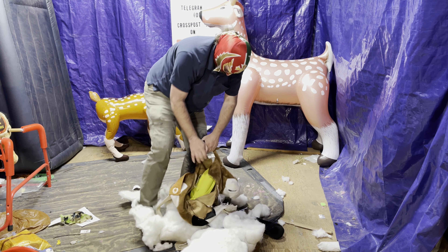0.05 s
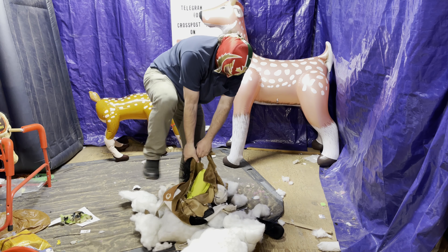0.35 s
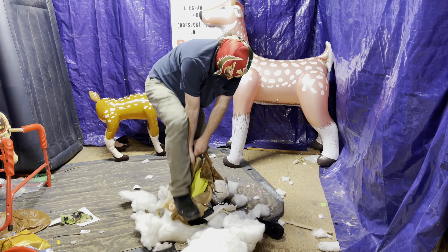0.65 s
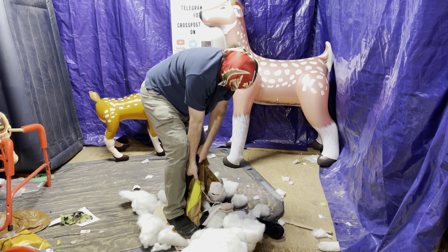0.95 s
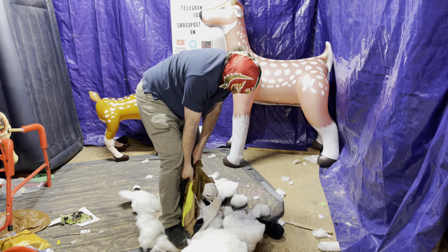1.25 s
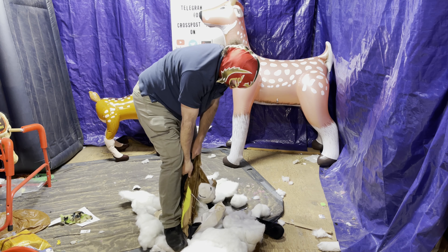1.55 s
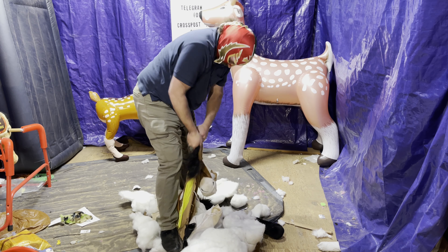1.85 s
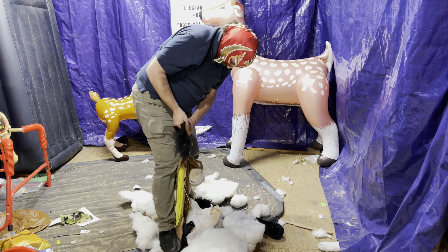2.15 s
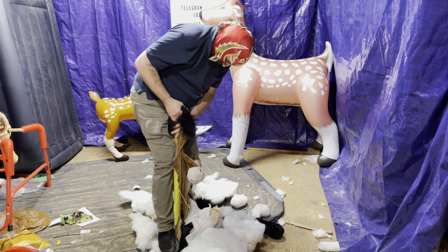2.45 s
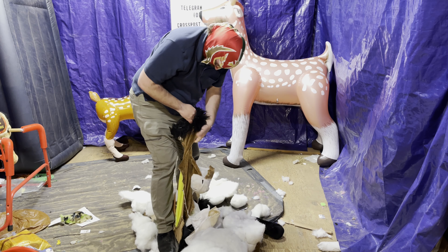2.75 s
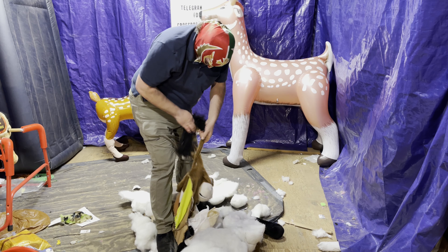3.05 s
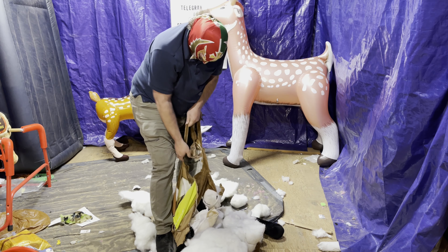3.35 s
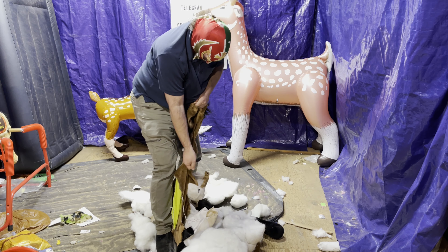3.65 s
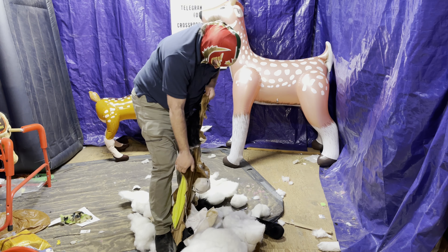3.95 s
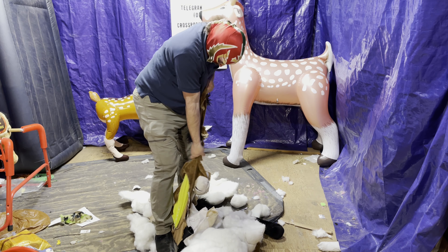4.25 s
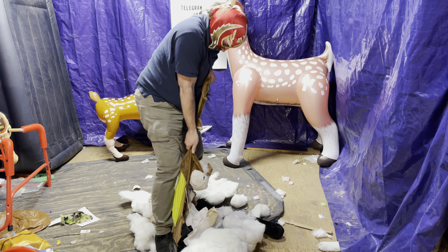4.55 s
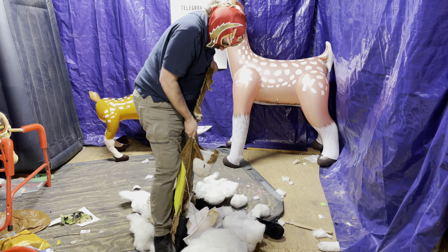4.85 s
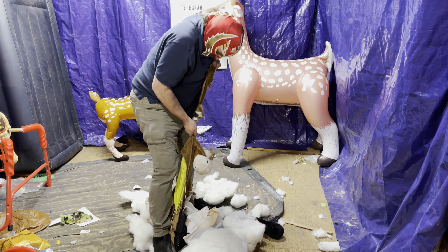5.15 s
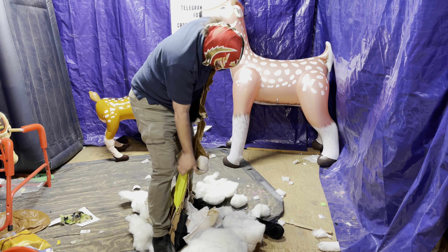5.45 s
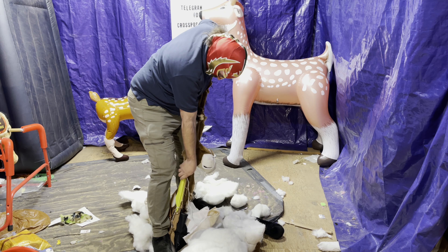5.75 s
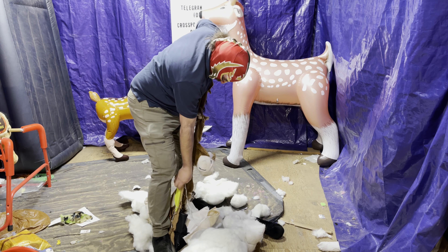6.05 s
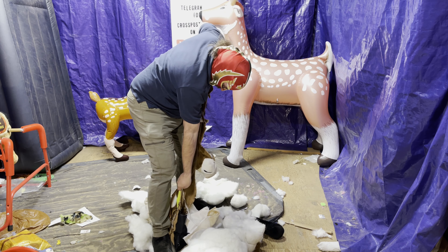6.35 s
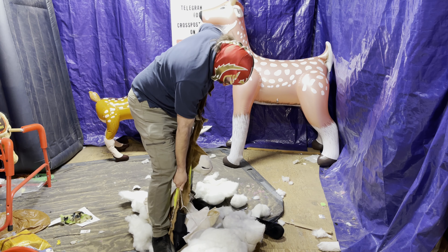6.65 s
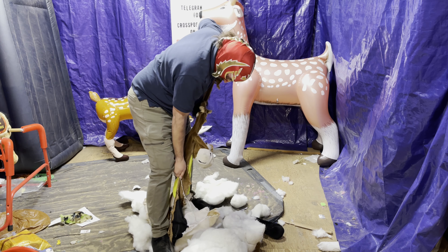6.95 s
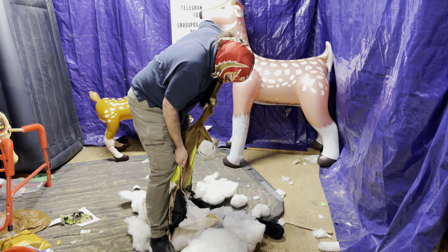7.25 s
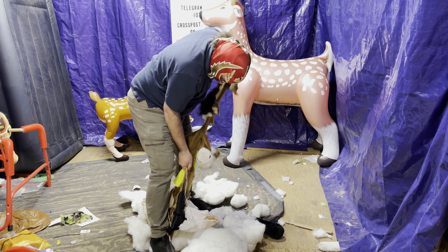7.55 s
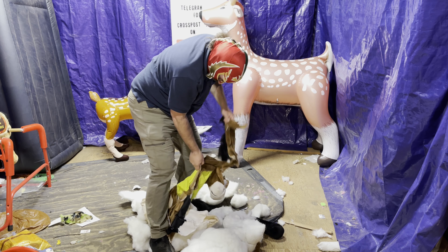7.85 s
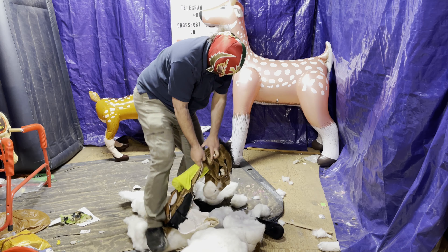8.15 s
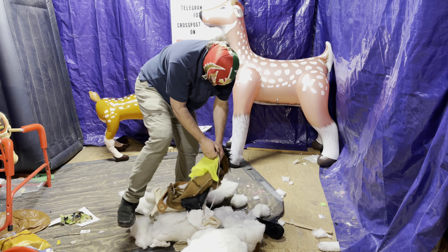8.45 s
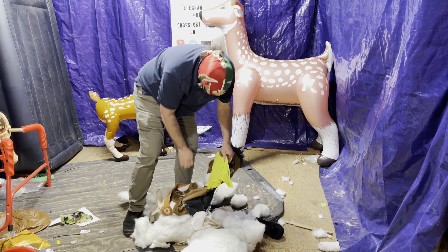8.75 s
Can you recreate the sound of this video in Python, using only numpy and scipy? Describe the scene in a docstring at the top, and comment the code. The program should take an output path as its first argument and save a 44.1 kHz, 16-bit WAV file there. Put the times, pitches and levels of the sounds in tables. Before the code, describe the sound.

A ventilation fan hums low and steady in a small room while the emptied skin of a large plush toy is torn by hand, a couple of metres away. Cloth slides softly and feet shift during the first second. From about 1 second seams snap with sharp cracks, each with a pop and flap of taut fabric, strongest near 1.6 seconds. From 1.8 to 2.5 seconds the weave runs in one longer, crackling tear. Quiet rustling follows, then a cluster of snaps and short rips around 3.3 to 3.5 seconds and four more snaps between 4.6 and 5 seconds. A soft step lands at 5.5 seconds. After faint rubbing and a few small ticks, a strong snap and dull flap free the strip at 7.3 seconds. Loose cloth swishes near 7.8 seconds, and a few steps tap and thud on boards until about 9 seconds.

```python
"""The emptied skin of a large plush toy is torn by hand in a small workshop, a couple of metres away.
Cloth slides and feet shift over a fan's steady hum. From 1 s seams snap: the thread cracks, the taut
cloth pops and flaps. At 1.8-2.5 s the weave runs in one long tear of many small threads; more snaps
follow near 3.4 s and 4.8 s. At 7.3 s the strip comes free and the whole skin flaps.
Swishes of loose cloth and a few steps end the scene."""
import sys
import numpy as np
from scipy import signal
from scipy.fft import rfft, irfft
from scipy.io import wavfile

SR = 44100
rng = np.random.default_rng(int(sys.argv[2]) if len(sys.argv) > 2 else 0)


def write(x):
    x = np.atleast_2d(x).T
    wavfile.write(sys.argv[1], SR, np.round(np.clip(x, -1, 1) * 32767).astype(np.int16))


N = 396900
TIME = np.arange(N) / SR
# a thread or seam gives way: (time [s], strength [dB], tautness [dB], pop [Hz])
SEAM_SNAPS = [(0.9908, -35.5, 3, 1380), (1.0554, -27.5, -2.5, 1300), (1.060, -34.5, -12.5, 1094),
              (1.3499, -22, 4.5, 1160), (1.4719, -21, 0, 1380), (1.639, -16, -1.5, 860),
              (1.805, -35.5, -3.5, 300), (1.934, -24, 4, 970), (1.980, -30.5, 3, 1200),
              (2.003, -25, 2.5, 755), (2.0214, -25.5, 0, 1270), (2.050, -25.5, 0.5, 830),
              (2.091, -28.5, 4.5, 420), (2.136, -27.5, 0, 720), (2.197, -26.5, 2.5, 1280),
              (2.288, -29, 1.5, 710), (2.320, -24.5, 2.5, 740), (2.595, -52.5, 8, 465),
              (3.116, -54, 0, 1520), (3.289, -32.5, 3.5, 1250), (3.327, -27, 5.5, 1180),
              (3.3706, -26.5, 1, 960), (3.394, -35.5, -4, 1170), (3.476, -33, -3, 380),
              (3.515, -30, 1.5, 720), (4.631, -22, -2, 567), (4.695, -25, -4.5, 570),
              (4.9667, -26.5, 2.5, 1810), (5.0045, -23.5, -3.5, 517), (6.795, -36, -6.5, 470),
              (7.045, -42, 7, 780), (7.062, -49, -9.5, 820), (7.254, -32, 5, 1900),
              (7.2628, -19.5, -4.5, 840), (8.656, -42, 5, 1450)]


def cracks(crack_db=20, tick_db=20):
    """A thread parts with a broad crack and a high tick, louder the tauter it was."""
    out = np.zeros(N)
    for s, strength_db, taut_db, _ in SEAM_SNAPS:
        add(out, s + 0.00039, from_db(strength_db + crack_db) * click(2300, 7500, spray_s=0.0014))
        add(out, s, from_db(strength_db + taut_db + tick_db) * burst(9400, 15000, decay_s=0.0016))
    return out


def recoils(pop_db=22, thud_db=17, floor_echo_share=0.5, parting_s=7.2675, parting_db=7):
    """Released cloth pops, the floor echoes it, the cloth flaps with a thud; slack cloth moves more."""
    out = np.zeros(N)
    for s, strength_db, taut_db, pop_hz in SEAM_SNAPS:
        recoil_db = strength_db - taut_db
        pop_gain = from_db(recoil_db + pop_db)
        pop = unit_energy(band(pulse(pop_hz, cycles=0.33), 220, 3800, order=1))
        add(out, s + 0.0007, -pop_gain * pop)
        add(out, s + 0.00198, pop_gain * floor_echo_share * burst(750, 1500, decay_s=0.0023))
        add(out, s + 0.0039, from_db(recoil_db + thud_db) * thud(hz=137.2))
    add(out, parting_s, from_db(parting_db) * thud(hz=121))  # strip comes free, whole skin flaps
    return out


def rips(edge_s=0.0037, tear_flap_db=-2.5):
    """The weave runs in one long tear and several short rips while the freed edge flaps."""
    # pull on the long tear: (time [s], level [dB])
    long_tear = [(1.799, -36.5), (1.85, -30), (1.885, -22), (1.92, -22), (1.959, -33), (2.061, -30.5),
                 (2.14, -37.5), (2.22, -27), (2.3, -40), (2.335, -27.5), (2.393, -22), (2.415, -38.5),
                 (2.5, -43.5)]
    # seam runs: (start [s], length [s], level [dB], relative flap [dB])
    short_rips = [(1.471, 0.046, -24.5, -2), (1.636, 0.08, -22, 7.5), (3.298, 0.05, -37.5, 9),
                  (3.381, 0.034, -31, 7), (3.474, 0.046, -38, 11), (3.52, .035, -28.5, 8),
                  (7.832, 0.039, -40, 1)]
    # spectra of threads and flapping cloth: (frequency [Hz], density [dB])
    thread_spectrum = [(100, -14.5), (250, 0.5), (700, -1.5), (1400, 0), (2500, -6.5), (4500, -7.5),
                       (7500, -8.5), (11000, -3.5), (16000, -10)]
    flap_spectrum = [(20, -13), (35, -8.5), (65, 4), (130, -1), (220, -5), (500, -19.5), (2000, -71.5)]
    tear_s, tear_db = np.transpose(long_tear)
    pull = from_db(np.interp(TIME, tear_s, tear_db)) * (TIME > tear_s[0]) * (TIME < tear_s[-1])
    flap = pull * from_db(tear_flap_db)
    for s, length_s, level_db, flap_db in short_rips:
        t = TIME[:int(length_s * SR)]
        run = from_db(level_db) * np.clip(np.minimum(t, length_s - t) / edge_s, 0, 1)
        add(pull, s, run)
        add(flap, s, run * from_db(flap_db))
    tearing = shaped_noise(thread_breaks(pull), thread_spectrum)
    flapping = shaped_noise(flap, flap_spectrum)
    return from_db(-4.5) * tearing + from_db(-12) * flapping


def thread_breaks(pull, spread_db=5.5, fuzz=0.4, bundle_s=0.00018):
    """Envelope of uneven threads breaking in turn, faster under a harder pull."""
    ref_per_s, min_per_s, ref_db, doubling_db = 760, 290, -28, 5
    doublings = (20 * np.log10(pull + 1e-9) - ref_db) / doubling_db
    chance = np.maximum(ref_per_s * 2 ** doublings, min_per_s) / SR
    sizes = rms_one(from_db(spread_db * np.minimum(rng.exponential(1, N), 3)))
    signs = rng.choice([-1, 1], N)
    threads = sizes * signs * (rng.random(N) < chance) / np.sqrt(chance)
    breaks = pull * (threads + fuzz * rng.standard_normal(N))
    bundle = unit_energy(np.exp(-TIME[:200] / bundle_s))  # a thread's fibres part in quick succession
    power = signal.fftconvolve(breaks ** 2, bundle ** 2)[:N]
    return np.sqrt(np.abs(power))


def rustle(grain_db=3):
    """Pile rubs on pile in small catches, swung cloth swishes darker; brief narrow hisses near 10 kHz."""
    # (start [s], length [s], level [dB])
    slides = [(0, 0.64, -53), (0.57, 0.42, -49), (0.871, 1.74, -51), (2.3, 0.75, -58.5), (2.996, 0.83, -57),
              (4.19, 0.44, -59.5), (4.4, 0.74, -53.5), (4.96, 0.64, -57), (6.231, 0.58, -58.5),
              (6.696, 0.85, -58.5), (7.427, 0.39, -56.5), (7.735, 0.28, -44.5), (7.895, 0.73, -52.5),
              (8.548, 0.57, -51)]
    swishes = [(0.067, 0.04, -37.5), (1.021, 0.04, -40), (6.78, 0.12, -44), (6.899, 0.085, -43.5),
               (7.11, 0.15, -48), (7.835, 0.11, -34.5), (8.079, 0.104, -50), (8.362, 0.1, -53.5),
               (8.856, 0.06, -50)]
    high_hisses = [(1.645, 0.15, -41.5), (2.45, 0.57, -62), (3.38, 0.031, -33), (3.52, 0.032, -33),
                   (8.64, 0.32, -53)]
    # spectra of the rustle, top cut off above 12 kHz: (frequency [Hz], density [dB])
    slide_spectrum = [(80, -11.5), (200, 5), (500, 8.5), (1200, 2), (2200, 1), (3200, -1.5), (4700, 2),
                      (7500, -2.5), (11200, 1), (12500, -15.5), (14000, -44.5)]
    swish_spectrum = [(30, -3.5), (70, 3), (140, 5), (300, -2), (550, -1.5), (1000, -2.5), (1800, -13),
                      (4000, -15), (8000, -17), (12000, -17), (16000, -45.5)]
    slide = eased_moves(slides) * from_db(grain_db * drift(rate_hz=260))
    swish = arches(swishes) * from_db(grain_db * drift(rate_hz=200))
    hiss = arches(high_hisses) * rms_one(band(rng.standard_normal(N), 9500, 10550))
    sliding = shaped_noise(slide, slide_spectrum)
    swishing = shaped_noise(swish, swish_spectrum)
    return from_db(-4.5) * sliding + from_db(-4) * swishing + hiss


def steps():
    """The sole taps and the weight comes down on the boards."""
    # (time [s], tap [dB], thud [dB])
    footfalls = [(.095, -59, -67), (0.804, -66, -47), (0.873, -60, -46), (5.534, -40.5, -41.5),
                 (7.941, -59, -36.5), (8.128, -53, -36), (8.405, -45, -47), (8.69, -29, -45),
                 (8.723, -45, -32)]
    out = np.zeros(N)
    for s, tap_db, thud_db in footfalls:
        tap = unit_energy(band(click(190, 650, spray_s=0.0034), 160, 1720))
        add(out, s, from_db(tap_db + 19) * tap)
        add(out, s, from_db(thud_db + 24.5) * thud(hz=79))
    return out


def fan(air_db=-52):
    """Ventilation fan: steady air noise with a few wavering tones."""
    # air noise: (frequency [Hz], density [dB])
    air_spectrum = [(15, -25), (28, -12), (50, 0), (100, -9.5), (175, -23), (300, -23), (490, -19),
                    (700, -23.5), (1300, -27.5), (2000, -31.5), (3500, -37), (8000, -40.5), (11500, -43),
                    (14000, -67)]
    # hum: (frequency [Hz], level [dB])
    tones = [(102, -59.5), (54.4, -61.5), (459, -72)]
    hum = 0
    for hz, db in tones:
        amplitude = np.sqrt(2) * from_db(db + 2 * drift(rate_hz=1.4))
        hum += amplitude * np.sin(2 * np.pi * hz * TIME + 0.5 * drift(rate_hz=0.57))
    return from_db(air_db) * coloured(diffuse(N), air_spectrum) + hum


def room(x, spots_per_s=22, spots=5):
    """The hands move from spot to spot, so the reflections keep changing."""
    out = 0
    for spot in range(spots):
        away = np.abs((TIME * spots_per_s - spot + 1) % spots - 1)
        presence = np.sqrt(np.clip(1 - away, 0, 1))
        out += signal.oaconvolve((x * presence)[None], room_response(), axes=1)[:, :N]
    return out


def room_response(build_cycles=1, size=2 ** 15):
    """Reverberation from one spot: later and longer in the bass, where single modes stand out."""
    # (frequency [Hz], T60 [s])
    decay_times = [(60, 0.87), (120, 0.32), (260, 0.31), (700, 0.29), (1800, 0.29), (5000, 0.3),
                   (12000, 0.19)]
    # (frequency [Hz], reverberant over direct [dB])
    reverb_gains = [(40, 5.5), (120, 1), (200, 6.5), (330, 4.5), (600, 4), (1200, 5), (1900, 9.5),
                    (2700, 4.5), (7000, 10.5), (11000, -3.5)]
    # (frequency [Hz], relative level [dB], T60 [s])
    modes = [(58, -3.5, 0.33), (72.7, -7, 0.66), (122, 3, 0.45), (148.1, 4, 0.45), (309.3, 2.5, 0.15)]
    t, hz = TIME[:size], np.fft.rfftfreq(size, 1 / SR)
    field, response = rfft(diffuse(size)), np.zeros((2, size))
    centres_hz = np.geomspace(40, 15000, 10)
    for centre_hz, share in zip(centres_hz, np.eye(len(centres_hz))):
        noise = irfft(field * at_hz(np.c_[centres_hz, share], hz))
        swell = 1 - np.exp(-t / (0.00011 + build_cycles / centre_hz))
        decay = from_db(-60 * t / at_hz(decay_times, centre_hz))
        response += noise * unit_energy(swell * decay) * from_db(at_hz(reverb_gains, centre_hz))
    for mode_hz, db, t60_s in modes:
        ring = np.cos(2 * np.pi * mode_hz * t) * from_db(-60 * t / t60_s)
        response += from_db(db - 32) * unit_energy(ring)
    return response


def diffuse(size):
    """Stereo noise from all sides: alike in the bass, less so above."""
    # (frequency [Hz], left-right correlation [-1..1])
    coherence = [(60, 0.86), (130, 0.74), (290, 0.63), (640, 0.029), (1400, 0.024), (3000, -0.18),
                 (12000, 0.46)]
    alike = at_hz(coherence, np.fft.rfftfreq(size, 1 / SR))
    mid, side = rfft(rng.standard_normal((2, size)))
    return irfft(np.sqrt((1 + alike) / 2) * mid + np.sqrt((1 - alike) / 2) * side * [[1], [-1]], size)


def direct(x, lag_samples=4):
    """The straight path reaches the left port before the right."""
    return np.array([x, np.r_[np.zeros(lag_samples), x[:-lag_samples]]])


def microphone_ports(x, cutoff_hz=11800, leak_db=-21):
    """Port resonances colour the top octave; above them the response drops to a low shelf."""
    # two ports resonating together and opposed: (centre [Hz], width [Hz], gain [dB])
    in_phase = [(7500, 880, -3), (9230, 260, 4), (10200, 460, -19), (10960, 640, 4.5)]
    opposed = [(8650, 1100, -10), (10500, 1600, 13), (12050, 600, -11.5)]
    mid = peaking_eq((x[0] + x[1]) / 2, in_phase)
    side = peaking_eq((x[0] - x[1]) / 2, opposed)
    x = np.array([mid + side, mid - side])
    return signal.sosfilt(signal.butter(10, cutoff_hz, fs=SR, output="sos"), x) + from_db(leak_db) * x


def click(low_hz, high_hz, spray_s):
    """A sharp impulse trailed by a spray of noise."""
    sharp = unit_energy(band(signal.unit_impulse(SR // 4) + 1e-18, low_hz, high_hz, order=1))
    return unit_energy(sharp + 0.43 * burst(low_hz, high_hz, spray_s))


def burst(low_hz, high_hz, decay_s):
    """A brief spray of band noise."""
    t = TIME[:SR // 4]
    spray = rng.standard_normal(len(t)) * np.exp(-t / decay_s)
    return unit_energy(band(spray + 1e-18, low_hz, high_hz))


def pulse(hz, cycles):
    """A heavily damped swing."""
    t = TIME[:SR // 4]
    return unit_energy(np.sin(2 * np.pi * hz * t) * np.exp(-t * hz / cycles))


def thud(hz, swell_s=0.02):
    """A broad, slow push of air that swells and dies."""
    push = band(pulse(hz, cycles=0.4), 0.33 * hz, 240)
    rumble = burst(50, 220, swell_s) * TIME[:SR // 4] / swell_s
    return unit_energy(push + 0.017 * rumble)


def eased_moves(gestures, attack_s=0.12, release_s=0.23):
    """Speed of sliding cloth: each arm move eases in and out."""
    out = np.zeros(N)
    for s, length_s, level_db in gestures:
        t = TIME[:int(length_s * SR)]
        ease = np.clip(np.minimum(t / attack_s, (length_s - t) / release_s), 0, 1)
        add(out, s, from_db(level_db) * np.sin(np.pi / 2 * ease) ** 2)
    return out


def arches(events):
    """Each event swells and dies in one arch."""
    out = np.zeros(N)
    for s, length_s, level_db in events:
        add(out, s, from_db(level_db) * np.sin(np.linspace(0, np.pi, int(length_s * SR))))
    return out


def drift(rate_hz):
    """Random wander of spread about 1."""
    count = int(rate_hz * N / SR) + 2
    return np.interp(TIME * rate_hz, np.arange(count), rng.standard_normal(count))


def shaped_noise(envelope, spectrum):
    return coloured(envelope * rng.standard_normal(N), spectrum)


def coloured(x, spectrum):
    """Shape a white signal to a spectrum, keeping its power."""
    gain = from_db(at_hz(spectrum, np.fft.rfftfreq(N, 1 / SR)))
    return irfft(rfft(x) * rms_one(gain), N)


def peaking_eq(x, bands):
    for hz, width_hz, db in bands:
        gain, damping = from_db(db / 2), np.pi * width_hz / SR
        tuning = -2 * np.cos(2 * np.pi * hz / SR)
        numerator = [1 + damping * gain, tuning, 1 - damping * gain]
        denominator = [1 + damping / gain, tuning, 1 - damping / gain]
        x = signal.lfilter(numerator, denominator, x)
    return x


def band(x, low_hz, high_hz, order=2):
    return signal.sosfilt(signal.butter(order, [low_hz, high_hz], "band", fs=SR, output="sos"), x)


def at_hz(points, hz):
    """Read a table on a log-frequency axis."""
    known_hz, values = np.transpose(points)
    return np.interp(np.log(np.maximum(hz, 1)), np.log(known_hz), values)


def add(track, s, sound):
    start = int(np.clip(round(s * SR), 0, N - 1))
    track[start:start + len(sound)] += sound[:N - start]


def from_db(db):
    return 10 ** (np.asarray(db) / 20)


def rms_one(x):
    return x / np.sqrt(np.mean(x ** 2) + 1e-20)


def unit_energy(x):
    return x / np.sqrt(np.sum(x ** 2) + 1e-20)


def scene(aim_db=4, balance_db=0.2):
    """Tearing, cloth and steps in the room, over the fan."""
    threads = cracks() + rips()
    movement = recoils() + rustle() + steps()
    # the tear faces forwards, so more of it arrives directly
    heard = direct(from_db(aim_db) * threads + movement) + room(threads + movement)
    return microphone_ports(heard) * from_db([[balance_db], [-balance_db]]) + fan()


def record(dry):
    """Clip at full scale, then cut the top."""
    stop_db, stop_hz = 70, 17200
    lowpass = signal.cheby2(12, stop_db, stop_hz, fs=SR, output="sos")
    return signal.sosfilt(lowpass, np.clip(dry, -1, 1))


dry = scene()
out = record(dry)
write(out)
```